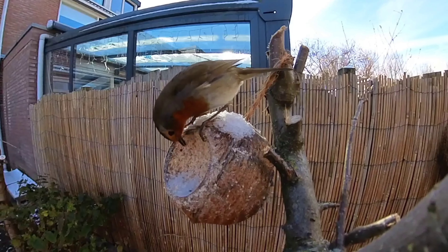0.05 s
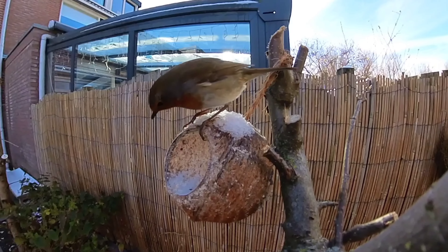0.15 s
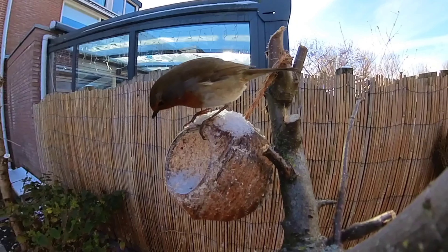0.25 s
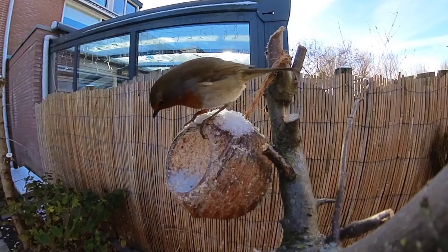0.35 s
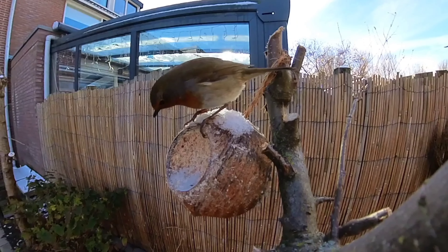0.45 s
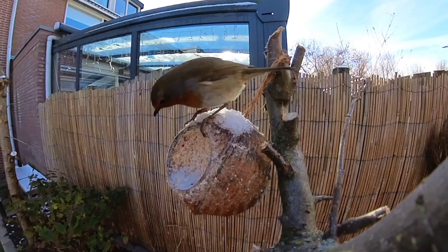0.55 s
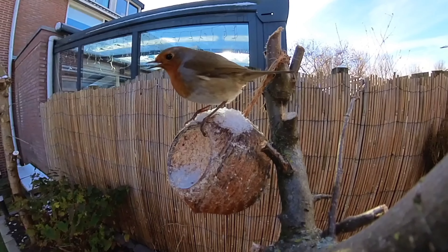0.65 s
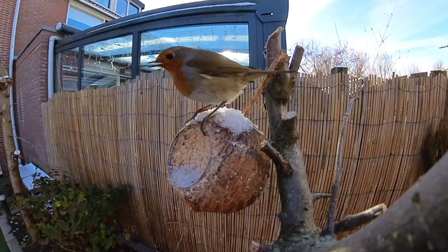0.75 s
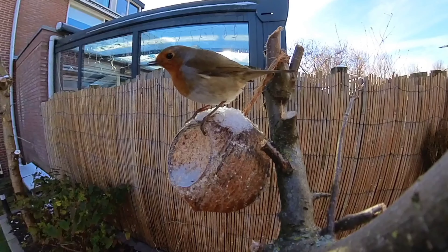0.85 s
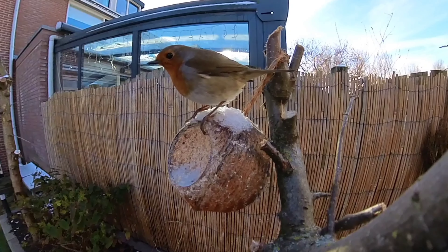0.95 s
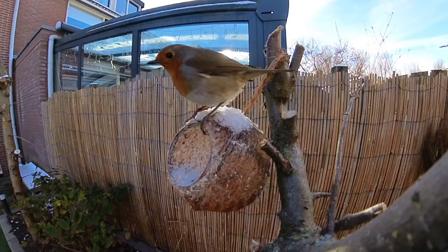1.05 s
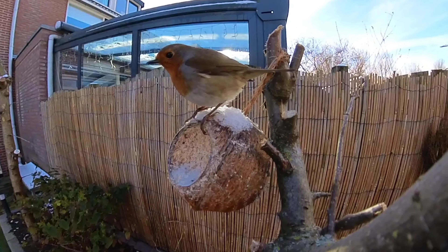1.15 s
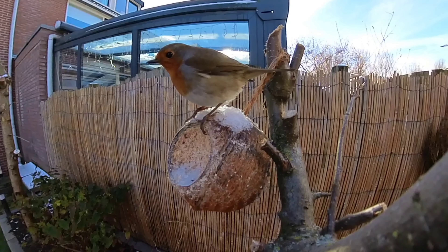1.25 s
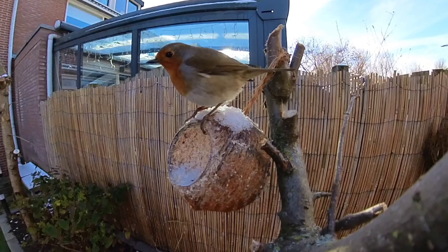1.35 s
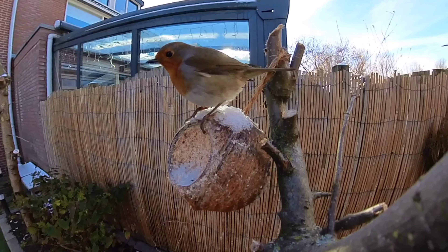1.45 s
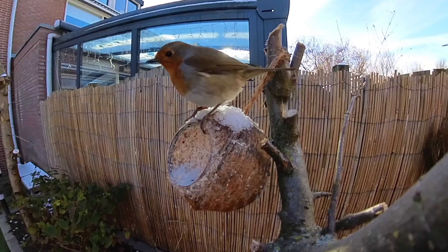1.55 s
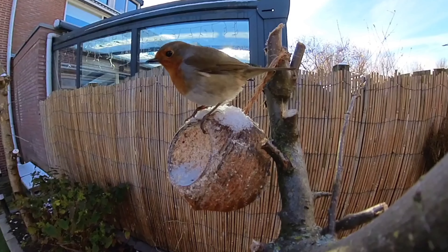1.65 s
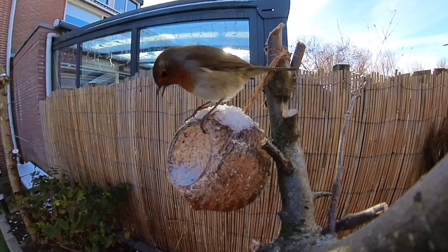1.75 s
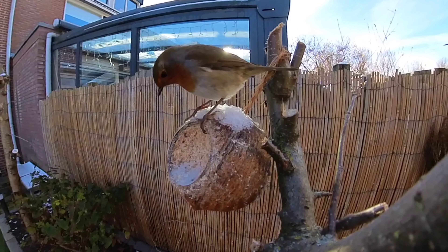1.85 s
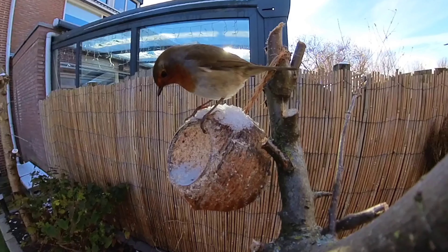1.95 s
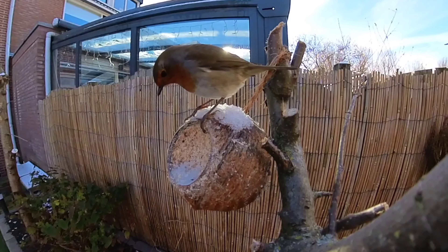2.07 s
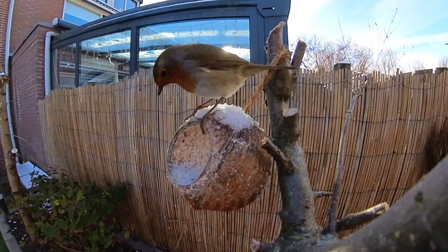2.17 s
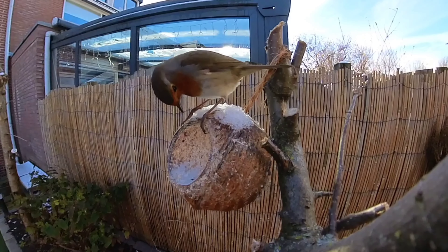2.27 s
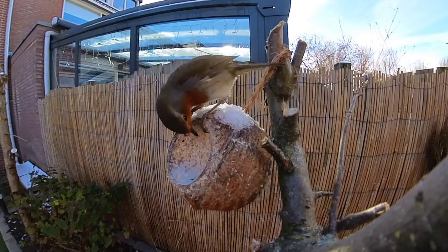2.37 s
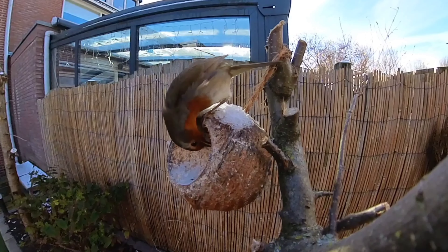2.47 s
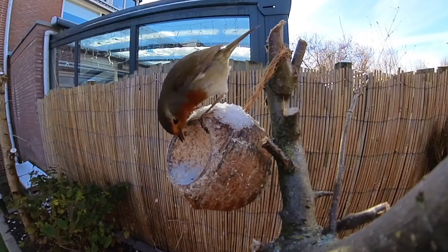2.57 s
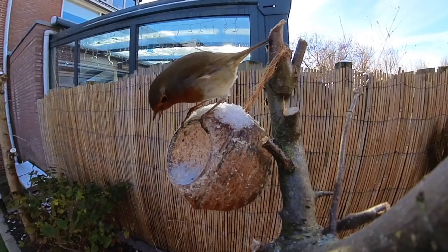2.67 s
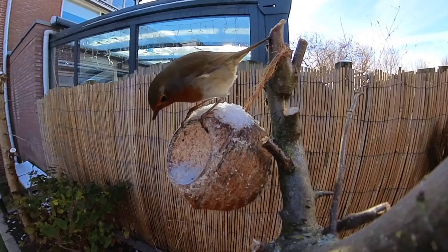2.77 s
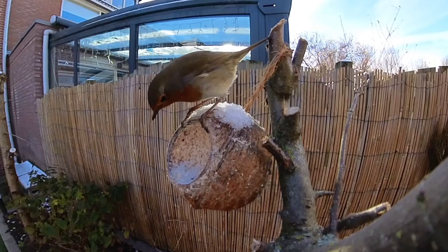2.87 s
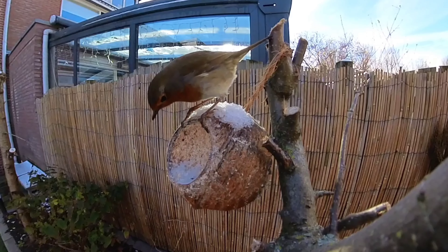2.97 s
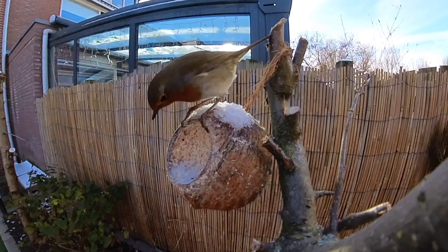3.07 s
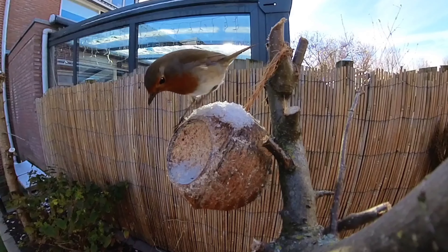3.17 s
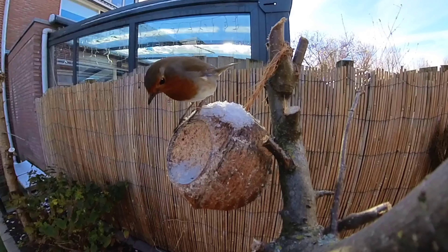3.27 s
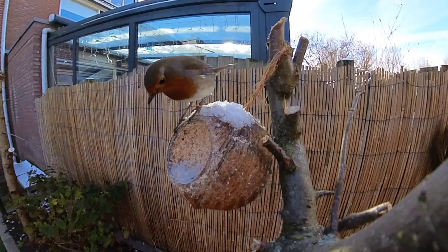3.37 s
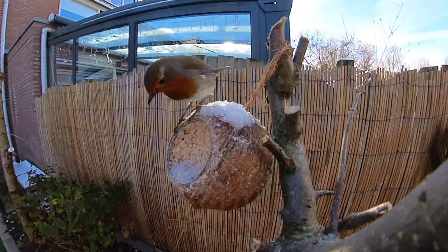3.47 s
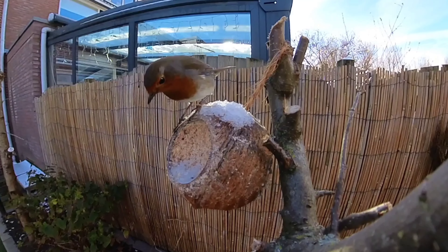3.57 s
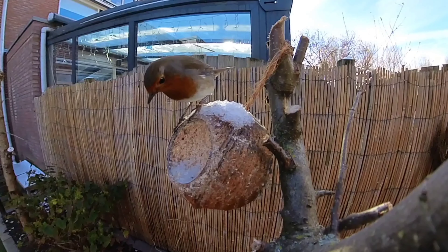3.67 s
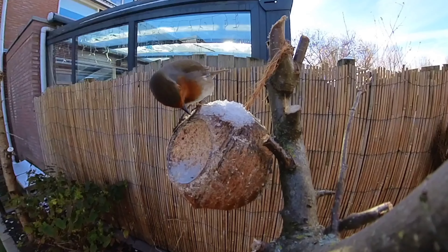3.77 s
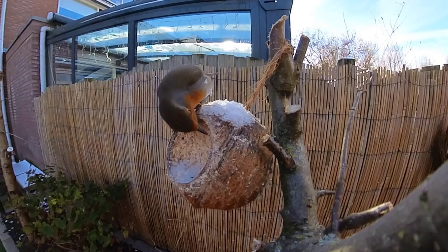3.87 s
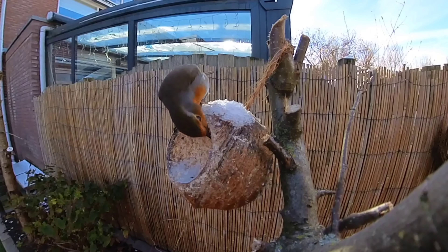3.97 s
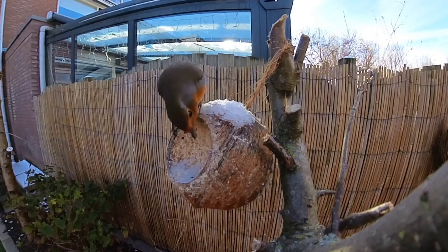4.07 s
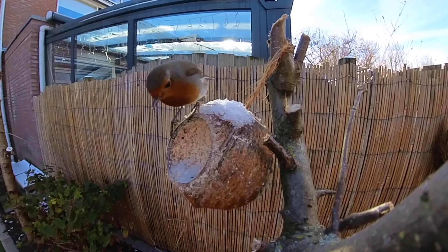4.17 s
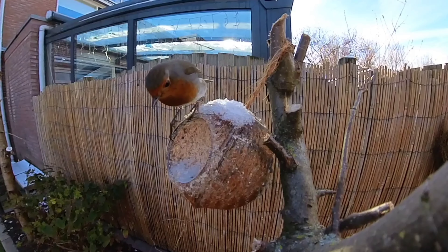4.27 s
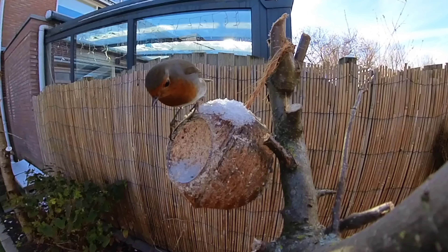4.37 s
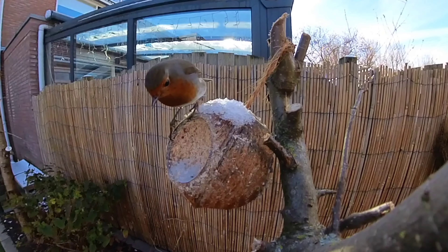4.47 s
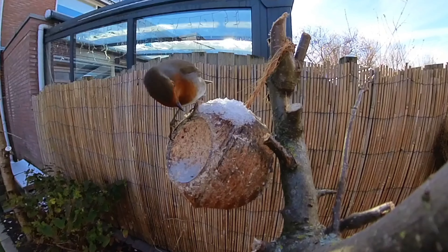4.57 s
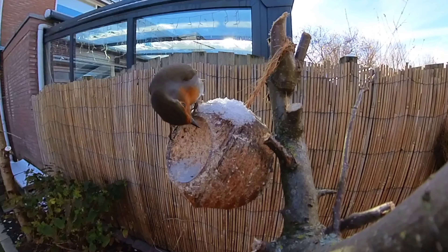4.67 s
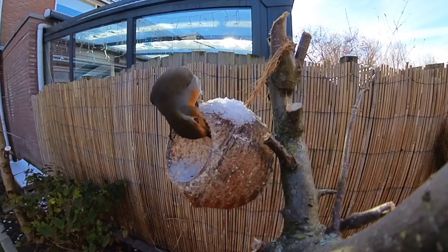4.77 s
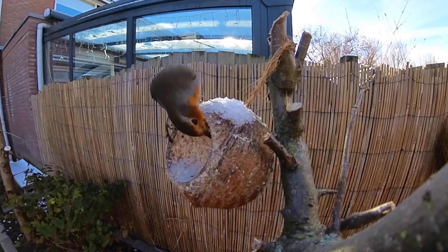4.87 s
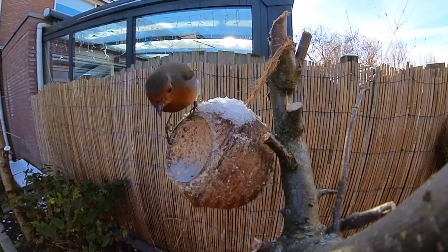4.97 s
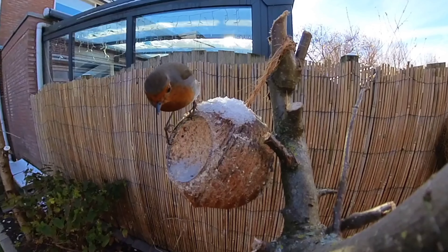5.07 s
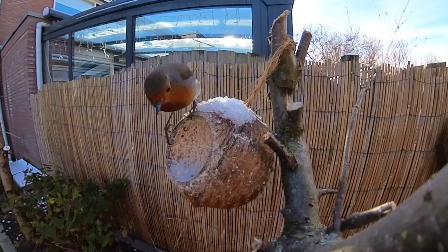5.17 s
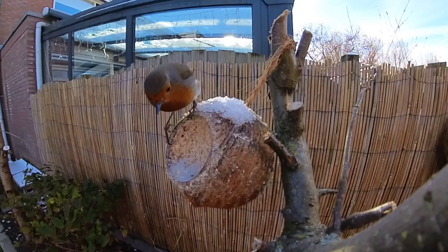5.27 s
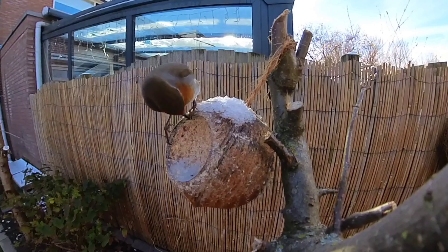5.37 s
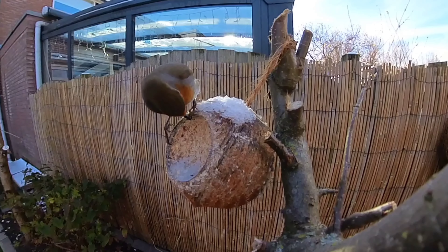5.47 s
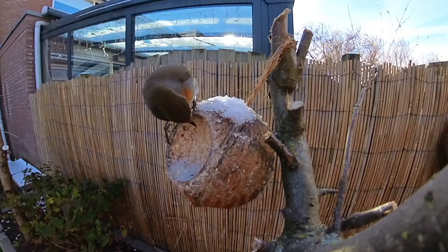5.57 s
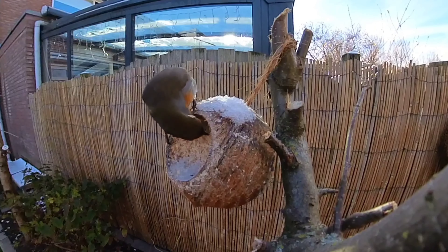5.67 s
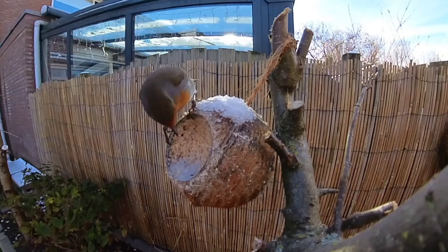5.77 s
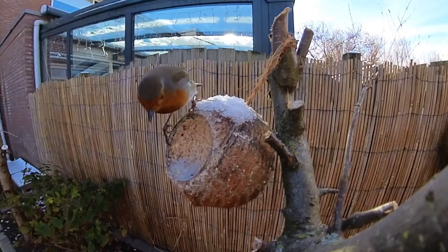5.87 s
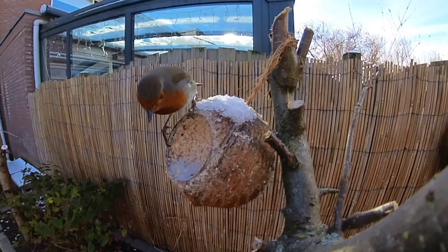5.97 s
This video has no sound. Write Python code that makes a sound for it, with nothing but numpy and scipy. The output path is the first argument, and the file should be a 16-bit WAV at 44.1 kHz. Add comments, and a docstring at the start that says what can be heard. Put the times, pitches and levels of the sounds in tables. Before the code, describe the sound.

Close to a hanging coconut-shell feeder in a quiet garden, a small bird pecks at once: a brittle cluster of ticks with a low woody thump. A sparse spell follows, with only faint scuffs and thin distant calls. From about 2.4 seconds more irregular bursts come, the deepest thuds near 4.1, 4.9 and 5.8 seconds. The microphone seems fixed to the branch, picking up its jolts.

```python
"""A garden murmurs throughout; soon a robin's beak and claws tick on a hung coconut-shell feeder.
Each jolt excites decaying branch modes and sets the trunk quivering; ticks, knocks and scuffs are
noise through shell resonances, answered by a fence as diffuse reflection.
Far birds then call thinly as narrow noise. After a sparse spell come more bursts from 2.4 s;
strong jolts fall near 4.1 s, 4.9 s and 5.8 s."""
import sys
import numpy as np
from scipy import signal
from scipy.fft import rfft, irfft, next_fast_len
from scipy.io import wavfile
from scipy.ndimage import uniform_filter1d, map_coordinates

SR = 44100
rng = np.random.default_rng(int(sys.argv[2]) if len(sys.argv) > 2 else 0)


def generate_wav(sig):
    """Save sig (samples, or channels by samples) to the path in sys.argv[1] as 16-bit PCM at SR."""
    pcm = np.round(np.clip(np.atleast_2d(sig).T, -1, 1) * 32767).astype(np.int16)
    wavfile.write(sys.argv[1], SR, pcm)


N = 265702


def amp(db):
    """Decibel law: the amplitude gain of a level in dB."""
    return 10 ** (np.asarray(db) / 20)


def unit(x):
    """Normalisation: x scaled to rms 1."""
    return x / np.sqrt(np.mean(x ** 2) + 1e-20)


def along(points, hz):
    """Interpolation of (f/Hz, value) points on a logarithmic frequency axis."""
    f, value = np.transpose(points)
    return np.interp(np.log(hz + 1), np.log(f + 1), value)


def wobble(rate):
    """Slow random modulation: a smooth curve through rate random knots a second."""
    knots = rng.standard_normal(int(N * rate / SR) + 4)
    return map_coordinates(knots, [np.arange(N) * rate / SR])


def filtered(x, response):
    """Linear filtering: the spectrum of x times a response that is a function of frequency."""
    m = next_fast_len(x.shape[-1] + 8192)  # padded, so that the ringing does not wrap round
    spectrum = rfft(x, m) * response(np.fft.rfftfreq(m, 1 / SR))
    return irfft(spectrum, m)[..., :x.shape[-1]]


def resonance(modes):
    """Modal superposition: causal (f/Hz, width/Hz, level/dB) modes, squared for steep flanks."""
    def response(f):
        total = 0
        for k, (centre, width, db) in enumerate(modes):
            damping = 1j * f * width
            total = total + (-1) ** k * amp(db / 2) * damping / (centre ** 2 - f ** 2 + damping)
        return total ** 2
    return response


# jolts through the wood: (t/s, twig level/dB, fork level/dB, bough level/dB, trunk level/dB,
# time after the jolt when the trunk's shiver stops/s)
JOLTS = [(0.1196, -32, -24.5, -37, -46, 0.26), (0.2, -53.5, -55, -68, -73, 0.13),
         (0.849, -69.5, -89, -73, -63.5, .08), (1.089, -84, -73, -58.5, -70, 0.066),
         (2.399, -67, -58, -84, -81, 0.091), (2.472, -84, -68, -72, -60.5, 0.27),
         (2.609, -42.5, -25, -35, -42, 0.29), (2.628, -34.5, -30, -27.5, -56.5, 0.2),
         (2.69, -52.5, -53, -48, -58.5, 0.57), (3.301, -56.5, -52, -68, -68, 0.047),
         (3.342, -52.5, -53, -54.5, -55.5, 0.13), (3.384, -57.5, -59, -65, -61, 0.081),
         (3.477, -75, -57, -77, -58.5, .05), (3.543, -87, -63, -81, -64, 0.056),
         (4.058, -37, -22.5, -37, -40.5, 0.33), (4.151, -62, -41, -62, -69, 0.19),
         (4.178, -51.5, -41, -49, -74, 0.26), (4.9005, -25, -18, -29.5, -39.5, 0.037),
         (4.962, -48.5, -33.5, -41, -64.5, 0.31), (5.017, -51.5, -37.5, -61, -47.5, 0.29),
         (5.219, -67.5, -65, -57, -61.5, 0.21), (5.804, -30, -18, -31.5, -46, 0.18),
         (5.878, -59.5, -50.5, -58, -57, 0.13)]
# modes of each branch: (f/Hz, level/dB relative to the jolt, swell time constant/s, T60/s)
TWIG = [(320.3, 11.5, 0.0085, 0.084), (366.1, 2.5, 0.021, 0.089), (458, -12.5, 0.0077, 0.053),
        (680, -34, 0.0051, 0.077)]
FORK = [(198, 5.5, 0.02, 0.078), (170.5, 10, 0.048, 0.12), (254.2, -11.5, 0.029, 0.15)]
BOUGH = [(136.6, 25.1, 0.071, 0.11), (98, 2.6, 0.02, 0.032), (77, 0.044, 0.0082, 0.1)]


def jolts(lift_per_db=0.0034, lift_below_db=-44.5):
    """Free vibration: jolts ring damped modes, neighbours in antiphase, the softest ones sharp."""
    out, t = np.zeros(N + SR), np.arange(SR // 2) / SR
    for (s, *levels), chance in zip(JOLTS, rng.standard_normal((len(JOLTS), 2))):
        for db, modes in zip(levels, (TWIG, FORK, BOUGH)):  # the trunk's level is left to quiver()
            detune = 1 + 0.0022 * chance[0] + lift_per_db * max(0, lift_below_db - db)
            for k, (hz, mode_db, swell, t60) in enumerate(modes):
                rise = (1 - np.exp(-t / swell)) ** 2
                tone = (-1) ** k * np.sin(2 * np.pi * hz * detune * t)
                out[round(s * SR):][:len(t)] += amp(db + mode_db - 60 * t / t60) * rise * tone
    return out[:N]


QUIVER_HZ = 44.8  # the trunk's slowest mode
KICK_SWELL_S, KICK_T60_S = 0.081, 0.14  # the first swing of the trunk
LINGER_DB, SETTLE_S = -11.5, 0.027  # the shiver after it: level, how fast it stops
# lumpy rumble riding on the swing and shiver: (f/Hz, width/Hz, level/dB before normalisation)
RUMBLE = [(70.4, 64, 0)]
RUMBLE_DB = -8.5  # against the tone


def quiver(uneven_db=1.0):
    """Fundamental mode: the trunk swings, shivers on unsteadily with a rumble, and stops."""
    level, t = np.zeros(N + SR), np.arange(SR) / SR
    swell = (1 - np.exp(-t / KICK_SWELL_S)) ** 2
    kick = swell * amp(-60 * t / KICK_T60_S)
    for s, *_, db, lasts in JOLTS:
        linger = swell * amp(LINGER_DB) / (1 + np.exp((t - lasts) / SETTLE_S))
        level[round(s * SR):][:SR] += amp(db) * (kick / kick.max() + linger)
    phase = 2 * np.pi * np.cumsum(QUIVER_HZ * (1 + 0.054 * wobble(14))) / SR
    rumble = unit(filtered(rng.standard_normal(N), resonance(RUMBLE)))
    tone = amp(uneven_db * wobble(22)) * unit(np.sin(phase))
    return level[:N] * (tone + amp(RUMBLE_DB) * rumble)


# beak and claw ticks: (t/s, bright peak level/dB, bright f/Hz,
# shell ring level/dB against bright, shell f/Hz, length scale/s)
TICKS = [(0.1212, -54, 8000, -1.5, 4550, 0.0073), (0.1313, -35.5, 9150, 1, 3950, 0.0024),
         (0.1387, -27.5, 8800, -5.5, 4560, 0.0011), (0.141, -36, 9600, -4, 4400, 0.0039),
         (0.144, -66, 10000, -4, 5500, 0.002), (0.1996, -47, 8800, -28, 4600, 0.0032),
         (1.8274, -58, 8200, -9, 5800, 0.0056), (2.403, -53.5, 9250, -17, 4970, 0.007),
         (2.632, -50, 9500, -11, 5500, 0.0068), (2.639, -40, 7640, -16, 5800, 0.0018),
         (2.646, -42, 9400, -28, 5300, 0.0036), (2.6553, -46, 9500, -17, 4400, 0.0021),
         (2.684, -52.5, 9800, -30, 4900, 0.0045), (3.304, -59, 9450, -28, 5000, 0.0034),
         (3.316, -48, 9900, -22, 5300, 0.003), (3.326, -46, 8800, -20, 5700, 0.0024),
         (3.3315, -49, 8200, -37, 4450, 0.0058), (3.333, -33, 7100, -33, 4400, 0.0085),
         (3.342, -41, 7450, -37, 4400, 0.0034), (3.358, -47.5, 8600, -14, 4400, 0.0061),
         (3.536, -65, 8400, 8, 4150, 0.012), (4.061, -43.5, 7600, -4.5, 4940, 0.0072),
         (4.149, -54, 7500, -18, 5200, 0.0074), (4.155, -48, 8440, -12, 4600, 0.0077),
         (4.16, -43.5, 9100, -15, 4470, 0.0017), (4.1664, -51, 10600, -8, 4400, 0.0052),
         (4.176, -43.5, 8750, -11, 4840, 0.0031), (4.903, -45.5, 7400, -3, 5100, 0.0074),
         (4.908, -38.5, 7300, -10, 4860, 0.0022), (4.918, -58, 8400, -7, 4400, 0.003),
         (4.993, -56, 8900, -6.5, 4850, 0.0022), (5.006, -48.5, 9700, -14, 4700, 0.0045),
         (5.027, -48, 9400, -8, 2600, 0.0021), (5.0304, -47.5, 8300, -12, 4970, 0.0032),
         (5.15, -62, 8900, -8.5, 4000, 0.0035), (5.167, -55.5, 8800, -20, 4470, 0.0018),
         (5.372, -57.5, 7400, -9, 4900, 0.0044), (5.806, -61, 9100, -3, 5800, 0.0075),
         (5.8125, -58, 8900, -1, 5500, 0.0027), (5.82, -55, 7900, -7, 4700, 0.006),
         (5.838, -49, 8350, -6.5, 5300, 0.0018), (5.904, -57, 9500, -13, 4070, 0.0027)]
# modes of the bright ring and of the shell: (f/Hz, width/Hz, level/dB before the lean)
BRIGHT = [(7190, 780, 1.5), (8770, 1520, 8), (9820, 1960, 6), (10830, 750, 6), (12370, 1000, -8)]
SHELL = [(2640, 770, -3.5), (3750, 720, 5.5), (4246, 710, 9), (5170, 780, 6.5), (6170, 950, 4.5)]


def leaning(modes, hz, lean_db, reach_hz):
    """Selective excitation: modes lose lean_db for every reach_hz away from the pitch hz."""
    return [(c, w, d - lean_db * abs(c - hz) / reach_hz) for c, w, d in modes]


def ticks(rise=2.87, fall=2.76, ragged_db=3, reach_hz=1500, lean_db=5, shell_lean_db=12):
    """Impact excitation: a ragged crunch builds to a snap and drives bright and shell modes."""
    out, t = np.zeros(N + SR), np.arange(-512, 512) / SR  # the snap is at t = 0
    for row, noise in zip(TICKS, rng.standard_normal((len(TICKS), 3, len(t)))):
        s, db, hz, shell_db, shell_hz, length = row
        bright = leaning(BRIGHT, hz, lean_db, reach_hz)
        shell = leaning(SHELL, shell_hz, shell_lean_db, reach_hz)
        distance = np.where(t < 0, -t / rise, t / fall) / length  # rise and fall in tick lengths
        shape = amp(-60 * distance ** 0.54)
        grit = amp(ragged_db * unit(uniform_filter1d(noise[2], size=16)))
        for crunch, modes, level in zip(noise * shape * grit, (bright, shell), (0, shell_db)):
            ring = filtered(crunch, resonance(modes))
            out[round((s + t[0]) * SR):][:len(t)] += amp(db + level) * ring / np.abs(ring).max()
    return out[:N]


# pecks that land squarely and knock dully: (t/s, peak level/dB)
KNOCKS = [(0.1337, -44), (0.1402, -45), (4.062, -60), (4.16, -59), (4.908, -57.5), (5.029, -62),
          (5.8384, -60.5)]
# broad low resonance of the shell: (f/Hz, width/Hz, level/dB before normalisation)
KNOCK = [(2270, 1800, 0)]
KNOCK_T60_S = 0.0033  # of the puff that drives it


def knocks():
    """Heavily damped resonance: a short puff of noise through the shell's broad low mode."""
    out, t = np.zeros(N + SR), np.arange(512) / SR
    for (s, db), noise in zip(KNOCKS, rng.standard_normal((len(KNOCKS), len(t)))):
        ring = filtered(noise * amp(-60 * t / KNOCK_T60_S), resonance(KNOCK))
        out[round(s * SR):][:len(t)] += amp(db) * ring / np.abs(ring).max()
    return out[:N]


# claws scuffing on the rough shell: (t/s, level/dB before catch and decay, f/Hz, T60/s)
SCUFFS = [(0.143, -61, 2530, 0.15), (0.146, -73, 5500, 0.14), (.174, -67, 8550, 0.046),
          (.2, -72.5, 8450, 0.23), (1.364, -73.5, 12200, 0.1), (1.365, -72.5, 6940, 0.15),
          (1.764, -69, 9000, 0.19), (1.763, -71, 4200, 0.11), (1.829, -72, 8360, 0.3),
          (4.9, -65, 11600, 0.09), (2.405, -67.5, 8800, 0.13), (2.641, -65, 5300, 0.056),
          (2.63, -69.5, 10100, 0.36), (2.695, -74, 9600, 0.1), (3.151, -70.5, 8400, 0.17),
          (3.212, -78, 8700, 0.29), (3.307, -72, 9650, 0.36), (3.361, -72, 7000, 0.2),
          (3.48, -75.5, 10000, 0.37), (3.482, -61.5, 4170, 0.041), (3.534, -69, 5370, 0.18),
          (3.536, -79, 8500, 0.19), (3.738, -71.5, 8750, 0.073), (4.001, -70.5, 8800, 0.16),
          (4.047, -73.5, 11500, 0.21), (4.067, -63, 5060, 0.12), (4.909, -63.5, 4930, 0.13),
          (4.178, -73.5, 7800, 0.33), (4.979, -63.5, 10400, 0.033), (5.03, -70.5, 3260, 0.25),
          (5.009, -66, 9500, 0.15), (5.129, -75.5, 8700, 0.59), (5.033, -70, 7860, .12),
          (5.375, -76, 7100, 0.16), (5.803, -73, 5100, 0.3), (5.856, -71.5, 5030, 0.055)]
# how broad the scuffed resonance is: (f/Hz, width/Hz)
SCUFF_WIDTH = [(3300, 7800), (4200, 200), (5400, 3500), (7100, 650), (8200, 2100), (10000, 6300)]


def scuffs(rise=0.0016, grain_db=5, catch_db=9, catch=0.0024, peaky_db=4, mode_hz=350, dull_hz=12500):
    """Friction noise: grit drives crowded modes, sharpest as the claw catches, then settling."""
    out, t = np.zeros(N + SR), np.arange(SR // 4) / SR
    for (s, db, hz, t60), noise in zip(SCUFFS, rng.standard_normal((len(SCUFFS), 3, len(t)))):
        grit = noise[0] * amp(grain_db * unit(uniform_filter1d(noise[1], size=60)))
        patch = resonance([(hz, along(SCUFF_WIDTH, hz), 0)])

        def response(f):
            peaks = amp(peaky_db * map_coordinates(noise[2], [f / mode_hz]))
            return patch(f) * peaks / (1 + (f / dull_hz) ** 8)

        ring = unit(filtered(grit, response))
        envelope = amp(db - 60 * t / t60 + catch_db * np.exp(-t / catch)) * (1 - np.exp(-t / rise))
        out[round(s * SR):][:len(t)] += envelope * ring
    return out[:N]


# decay of the fence's answer: (f/Hz, T60/s)
FENCE = [(2000, 0.13), (6000, 0.16), (12000, 0.13)]


def fence(x, block=2048):
    """Diffuse reflection, mid and side: decaying noise, drawn anew for each stretch of sound."""
    out = np.zeros((2, N + SR))
    for i in range(0, N, block):
        if np.any(x[i:i + block]):
            hz, t, z = signal.stft(rng.standard_normal((2, SR // 6)), SR, nperseg=128)
            decay = amp(-60 * t / along(FENCE, hz)[:, None])
            tail = signal.istft(z * decay, SR, nperseg=128)[1]
            wet = signal.fftconvolve(x[None, i:i + block], tail / np.linalg.norm(tail[0]), axes=1)
            out[:, i:i + wet.shape[1]] += wet
    return out[:, :N]


# far calls: (t/s, length/s, start f/Hz, end f/Hz, level/dB before fade and waver)
CALLS_FAR = [(0.285, 0.22, 3700, 3680, -85), (0.422, 0.15, 5650, 6500, -85),
             (1.773, 0.11, 5930, 6000, -80.5), (3.147, 0.05, 5600, 5600, -83),
             (3.196, 0.16, 5950, 5970, -77), (3.325, 0.053, 4440, 4450, -72),
             (3.347, 0.075, 4040, 3950, -81), (3.465, 0.11, 4180, 4150, -76),
             (3.536, 0.16, 4000, 3890, -77), (3.568, 0.037, 1460, 1480, -77)]


def far_birds(blur_hz=230, waver_db=3, fade_db=6.5):
    """Multipath fading: gliding whistles, weakening, blurred to narrow noise by many echoes."""
    out, echoes = np.zeros(N), [wobble(blur_hz), wobble(blur_hz)]
    for s, length, hz0, hz1, db in CALLS_FAR:
        n, i = round(length * SR), round(s * SR)
        phase = 2 * np.pi * np.cumsum(np.linspace(hz0, hz1, n)) / SR
        blurred = echoes[0][i:i + n] * np.sin(phase) + echoes[1][i:i + n] * np.cos(phase)
        envelope = np.hanning(n) ** 0.07 * amp(np.linspace(0, -fade_db, n))
        out[i:i + n] += amp(db) * envelope * blurred
    return out * amp(waver_db * wobble(40.14))


# spectrum of the garden noise before normalisation: (f/Hz, relative density level/dB)
GARDEN = [(25, -11.5), (54, -4), (131, -4.5), (200, -3.5), (297, -10.5), (477, -14), (600, -18),
          (1100, -22), (1600, -30), (3000, -29.5), (4000, -27.5), (5000, -30), (8500, -32.5), (11500, -42),
          (15500, -57.5)]
GARDEN_DB = -68.5  # rms of the mid
# side against mid: (f/Hz, level/dB)
WIDTH = [(100, -78), (2900, -28), (3300, -6.5), (8000, -2), (8800, -22), (15000, 1)]


def garden(patchy_db=2.26, lumpy_db=1.13, lumpy_hz=300):
    """Shaped noise: far traffic and air, faintly patchy, lumpy in the bass, wide in the treble."""
    z = signal.stft(rng.standard_normal((2, N)), nperseg=512)[2]
    field = uniform_filter1d(rng.standard_normal(z.shape[1:]), size=6, axis=0)
    field = uniform_filter1d(field, size=14, axis=1)
    pair = signal.istft(z * amp(patchy_db * unit(field)), nperseg=512)[1][:, :N]
    pair = filtered(pair, lambda hz: amp(along(GARDEN, hz)) * [1 + 0 * hz, amp(along(WIDTH, hz))])
    bass = filtered(pair, lambda hz: 1 / (1 + (hz / lumpy_hz) ** 2))
    pair = pair + bass * (amp(lumpy_db * wobble(13)) - 1)
    return amp(GARDEN_DB) * pair / np.sqrt(np.mean(pair[0] ** 2))


def scene():
    """Superposition: direct sound reaches both channels alike; garden and fence add width."""
    shell = ticks() + knocks() + scuffs()
    mid, side = garden() + fence(shell) * amp([[-19], [-23]])  # fence gain/dB in mid and side
    mid = mid + shell + jolts() + quiver() + far_birds()
    return np.array([mid + side, mid - side])


TOP_HZ = 15600


def record(dry):
    """Band limiting: nothing passes from TOP_HZ upwards."""
    return filtered(dry, lambda hz: hz < TOP_HZ)


dry = scene()
out = record(dry)
generate_wav(out)
```